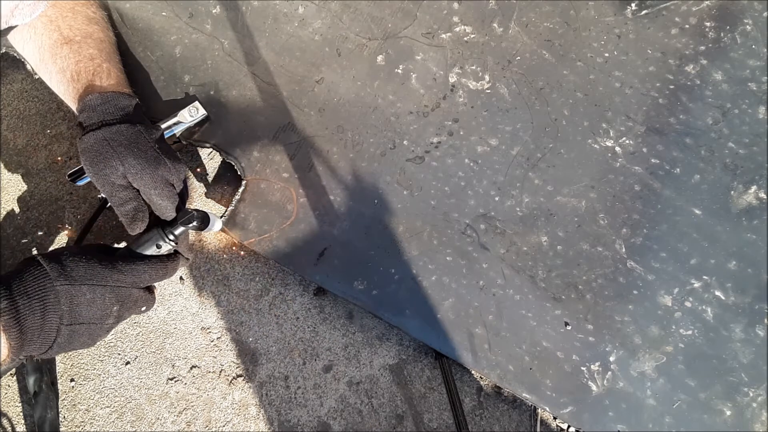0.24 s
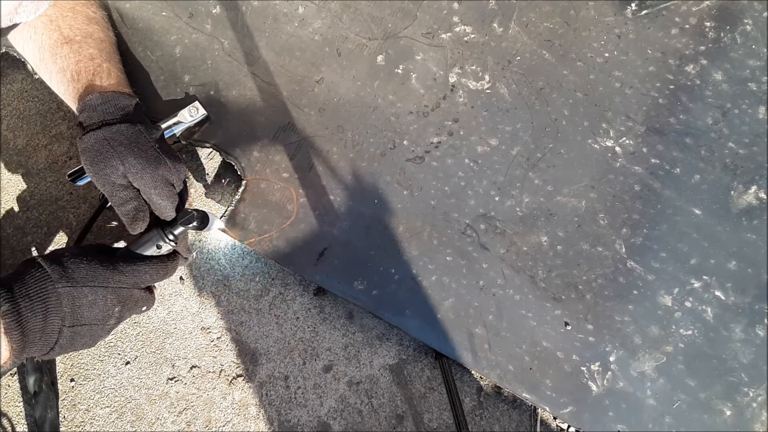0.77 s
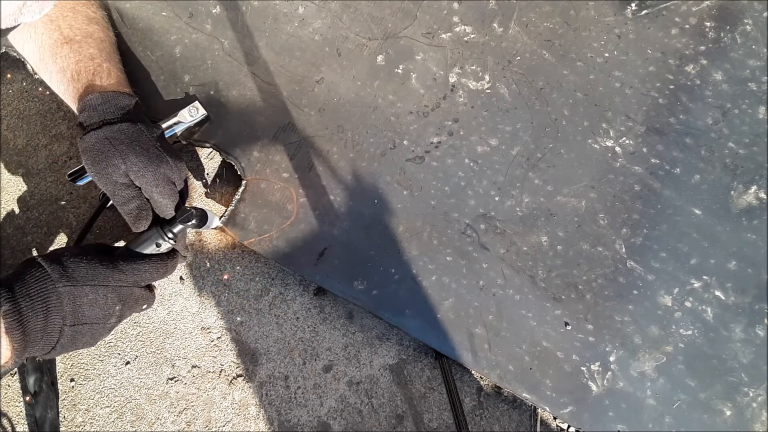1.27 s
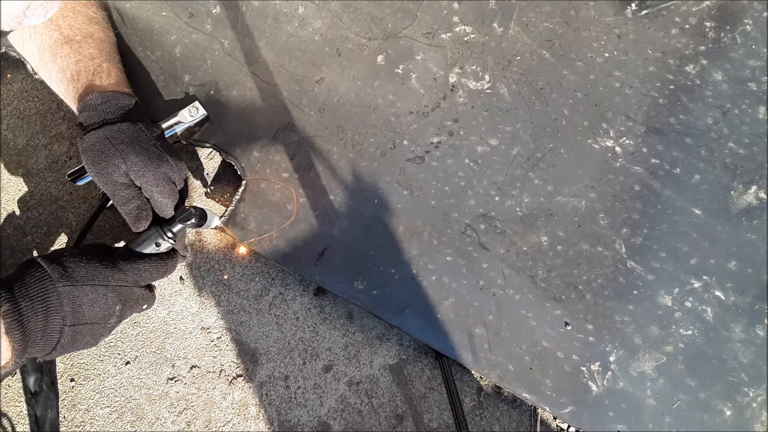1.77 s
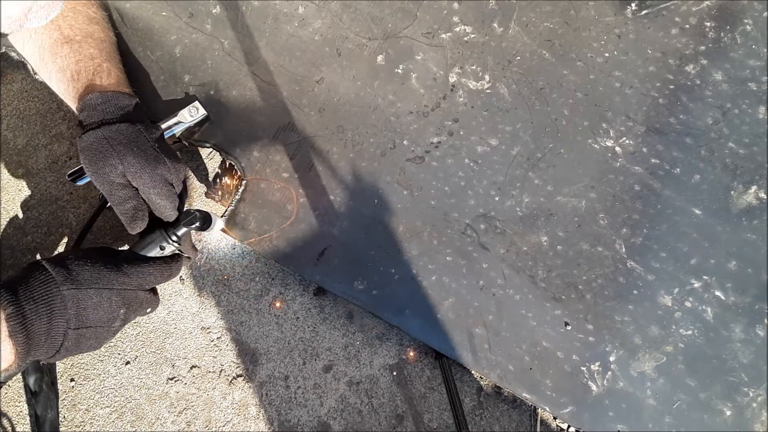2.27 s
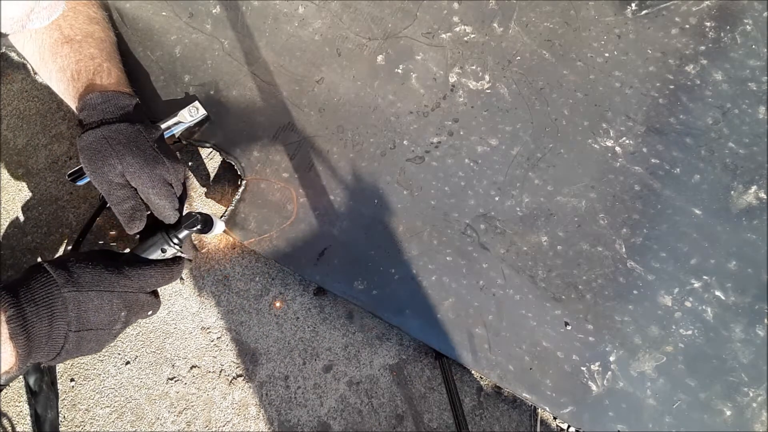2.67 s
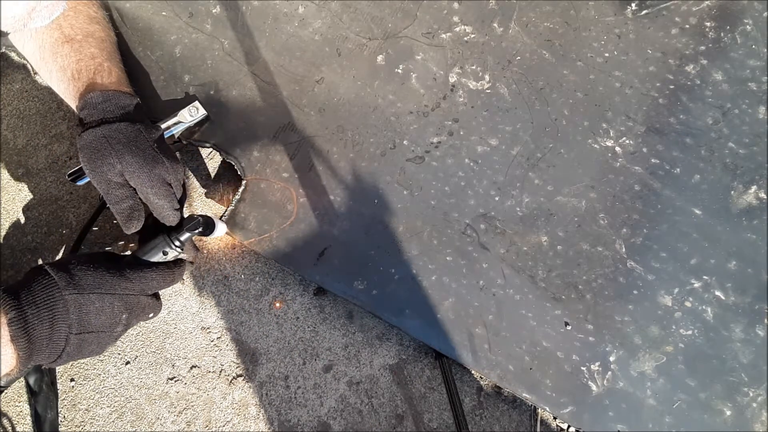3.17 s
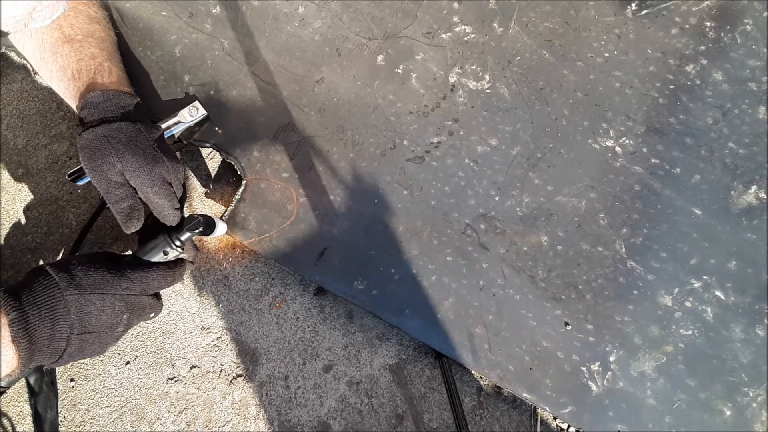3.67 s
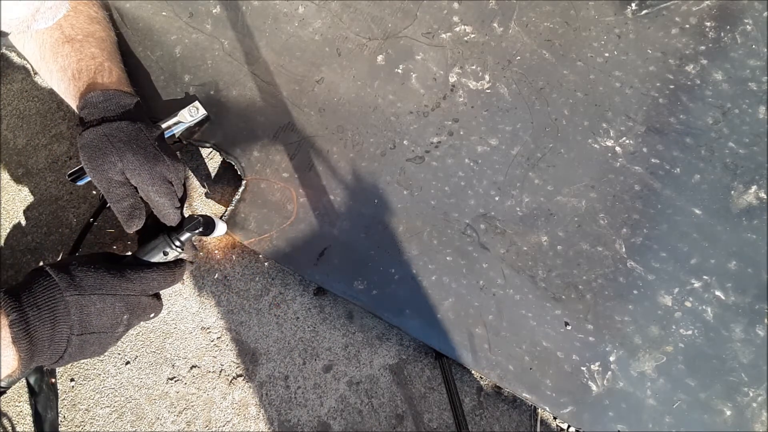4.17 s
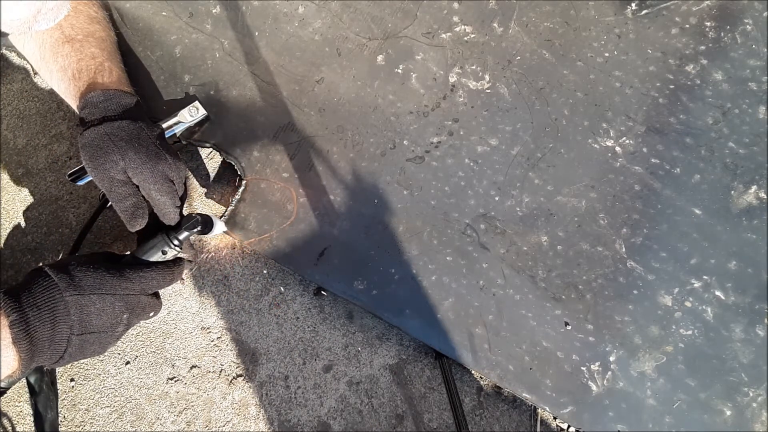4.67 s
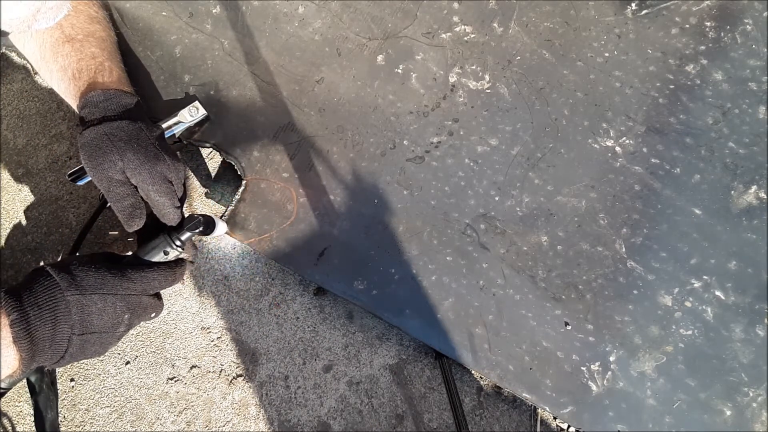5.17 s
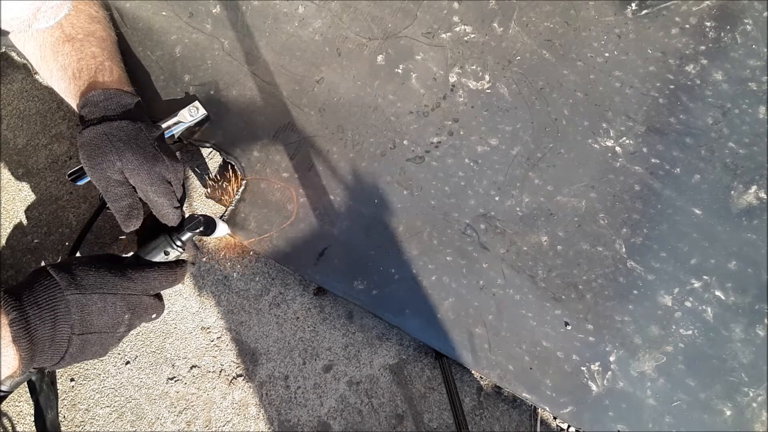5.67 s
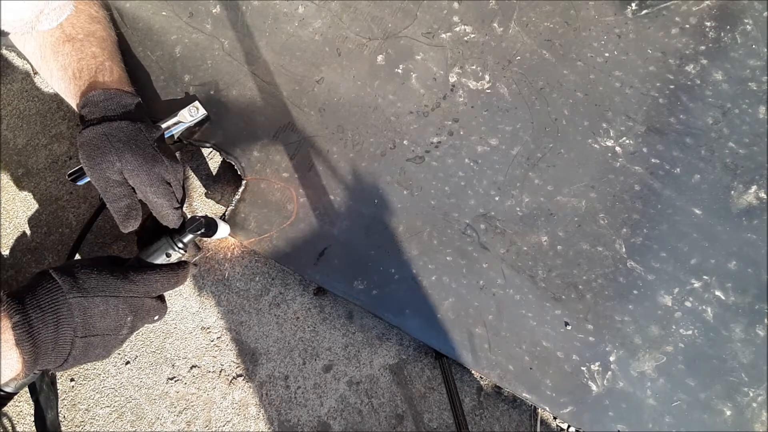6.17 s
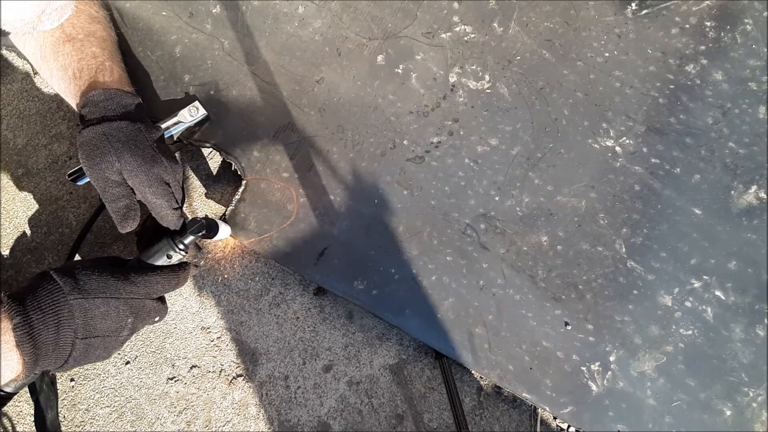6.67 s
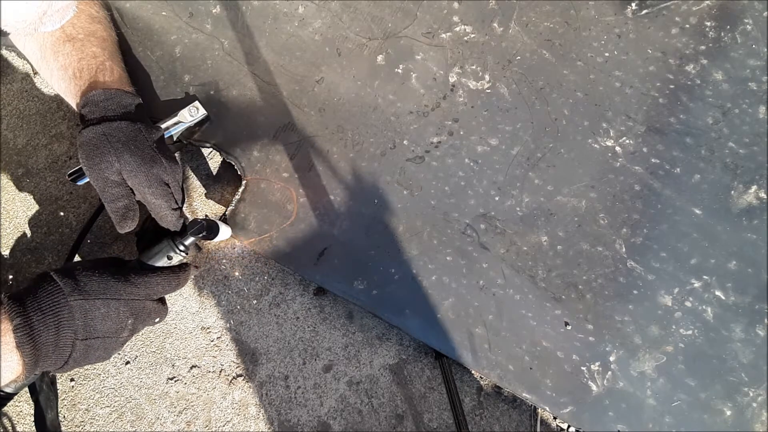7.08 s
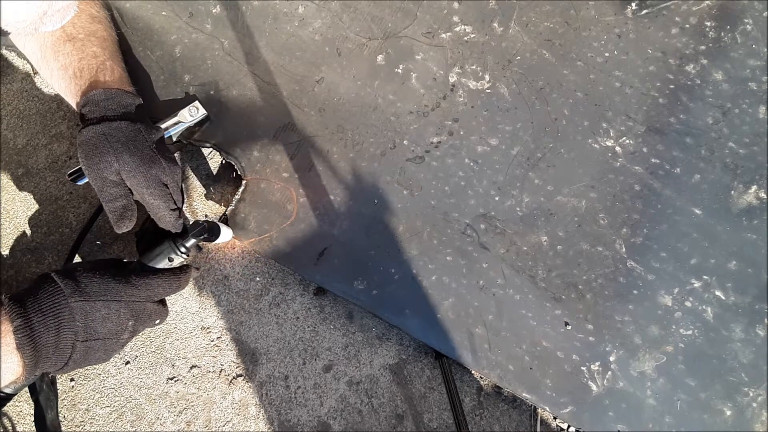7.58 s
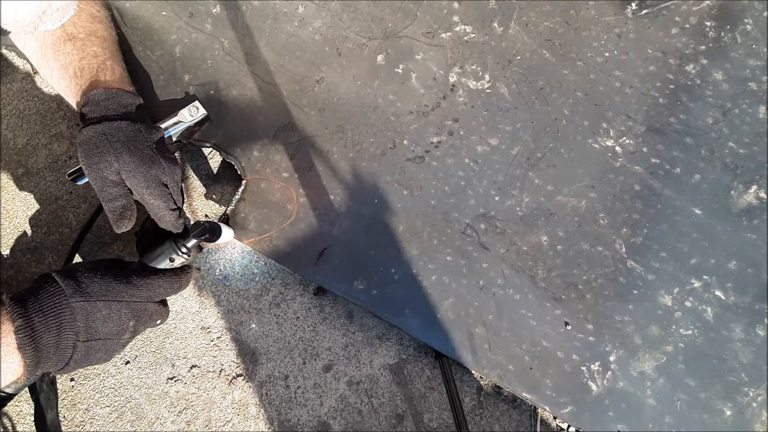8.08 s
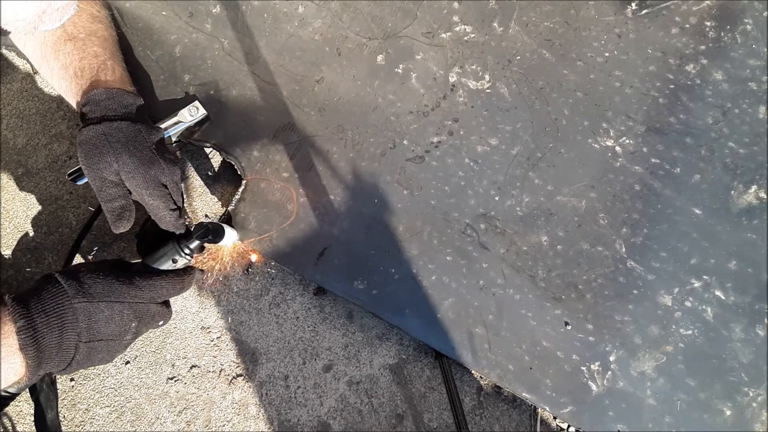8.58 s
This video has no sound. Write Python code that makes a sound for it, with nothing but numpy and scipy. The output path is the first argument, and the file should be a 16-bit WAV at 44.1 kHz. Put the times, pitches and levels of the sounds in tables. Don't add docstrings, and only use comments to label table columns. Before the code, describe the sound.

Close up outdoors, a plasma torch cuts a steel sheet. Bright, fizzy, raspy arc noise comes in short uneven bursts, each ending in a dull pop and restarting with a tiny buzz, while compressed air hisses steadily beneath. Longer burns follow, and the last runs unbroken to the end. Thin stereo sound, slightly left, with short reflections off metal and concrete and a faint low murmur far away.

```python
import sys
import numpy as np
from scipy import signal
from scipy.fft import rfft, irfft, next_fast_len
from scipy.io import wavfile
from scipy.ndimage import uniform_filter1d, map_coordinates

SR = 44100
rng = np.random.default_rng(int(sys.argv[2]) if len(sys.argv) > 2 else 0)


def amplitude_ratio(level_db):
    exponent = np.asarray(level_db, float) / 20
    return 10 ** exponent


def output_pcm(signal):
    pcm = np.clip(np.atleast_2d(signal).T, -1, 1) * 32767
    wavfile.write(sys.argv[1], SR, np.round(pcm).astype(np.int16))


N = 389403
TIME = np.arange(N) / SR

# strike_s, out_s, settling_time_s, start_over_full_power_db
BURNS = [
    (.042, .2158, 0.031, 7),
    (0.393, 0.515, .03, 2),
    (0.679, 0.903, .012, -7),
    (1.067, 1.198, .012, -5),
    (1.372, 1.784, 0.018, -7),
    (1.953, 3.591, 0.013, -4),
    (3.843, 4.21, 0.18, -6),
    (4.399, 4.807, .05, -8.5),
    (5.163, 5.2483, 0.046, 2),
    (5.418, 9, 0.07, -11),
]


def burning():
    total = np.zeros(N)
    for strike, out, settling, start_db in BURNS:
        rise = np.clip((TIME - strike) / 0.0022, 0, 1)
        settle = amplitude_ratio(start_db * np.clip(1 - (TIME - strike) / settling, 0, 1))
        fall = np.clip((out - TIME) / .001 + 1, 0, 1)
        total += rise * settle * fall
    return total


# time_s, jet_power_db, bite_into_steel_db, stand_off_brightness_db
TORCH_PATH = [(0, -41, -2, 0), (.5, -40, -1, 3), (.9, -38, 1, 3), (1.45, -34.5, -1, 1.5),
              (1.75, -34.5, -5, 1), (2.2, -36, 0.5, 2.5), (2.75, -46, 0.5, 0), (3.05, -42.5, -0.5, 3.5),
              (3.25, -45, 2.5, 0.5), (3.58, -36.5, 2.5, 4), (4.2, -36.5, 2.5, 2), (4.8, -33.5, 1, 2),
              (5.5, -39, 3.5, 3.5), (5.85, -36.5, -1, 1.5), (6.05, -39.5, 2, 1.5), (6.65, -37.5, -1, 3),
              (8.4, -38.5, 0, 1.5), (8.78, -35.5, -0.5, 2.5)]
# time_s, length_s, jet_change_db, bite_change_db
STUMBLES = [(1.41, .04, 2, 0), (1.72, .14, 2, -1.5), (2.095, 0.032, -3.5, -6), (2.22, .06, 0, 3.5),
            (2.707, .04, -1.5, 4.5), (3.114, .05, 2.5, -4), (3.423, .04, 2.5, -4.5),
            (4.407, 0.014, 7.5, -4), (4.557, 0.049, 0.5, 0), (4.712, 0.074, -4.5, -1.5), (5.6, .18, -2, 2),
            (6.224, .08, 0, 0.5), (6.8, .06, -1, 1), (7.15, 0.029, 1.5, 0), (7.293, 0.031, -3.5, -1),
            (7.328, 0.063, 0, 2.5), (7.427, 0.077, -2, 2), (7.603, 0.11, 1.5, 2), (8.0, .03, 2, -4),
            (8.026, 0.024, -0.5, 3), (8.47, .05, 1, 2), (8.58, .1, -1.5, 0)]
# pitch_hz, level_db (per Hz)
HISS_COLOUR = [(4000, -24), (5600, -7.5), (6300, -3), (8000, -3), (10000, 2), (10800, 2), (12500, -21)]
FIZZ_COLOUR = [(9500, -18), (11000, -1), (12000, 3), (14000, 2), (15400, 0.5), (16500, -1)]
RASP_COLOUR = [(900, -17.5), (1600, -4), (2000, -0.5), (2500, -1.5), (3700, -1), (5000, -1), (7000, -16.5)]
ROAR_COLOUR = [(60, -12), (150, -14), (400, -3), (800, 1.5), (1300, 1), (2400, -9)]


def arc():
    s, *columns = np.transpose(TORCH_PATH)
    jet_db, bite_db, fizz_db = [np.interp(TIME, s, column) for column in columns]
    for at, length, jet_step, bite_step in STUMBLES:
        bump = np.exp(-.5 * (2 * (TIME - at) / length) ** 2)
        jet_db = jet_db + jet_step * bump
        bite_db = bite_db + bite_step * bump
    flicker_db = .25 * wobble(7.6) + 0.57 * wobble(25) + 0.79 * wobble(110) + 0.29 * wobble(500)

    hiss_db = 2.5 + .4 * wobble(8)
    fizz_db = fizz_db + 2.5 + .4 * wobble(8)
    rasp_db = -3.5 + 0.64 * bite_db + 1.78 * wobble(15)
    roar_db = -12 + 1.44 * bite_db + 0.68 * wobble(9)

    hiss = amplitude_ratio(hiss_db) * turbulence(HISS_COLOUR, patchy_db=.7, drift_db=1.6, spit=.2, spread=.66)
    fizz = amplitude_ratio(fizz_db) * turbulence(FIZZ_COLOUR, patchy_db=.7, drift_db=1.6, spit=.2, spread=.62)
    rasp = amplitude_ratio(rasp_db) * turbulence(RASP_COLOUR, patchy_db=0.84, drift_db=-0.8, spit=0.24, spread=0.51)
    roar = amplitude_ratio(roar_db) * turbulence(ROAR_COLOUR, patchy_db=2.0, drift_db=1.3, spit=0.31, spread=0.45)
    return burning() * amplitude_ratio(jet_db + flicker_db) * (hiss + fizz + rasp + roar)


# start_s, length_s, first_rate_hz, last_rate_hz, level_db
BUZZES = [
    (0.046, .016, 503, 450, -47),
    (.396, .014, 443, 420, -43),
    (0.6907, .04, 528, 402, -32),
    (1.074, .036, 387.5, 443, -34),
    (1.3785, .014, 666, 392, -36),
    (1.963, .011, 523, 497, -37.5),
    (3.843, .008, 458, 450, -44),
    (4.399, .012, 462, 452, -40.5),
    (5.169, .008, 500, 500, -40),
]


def buzz():
    out = np.zeros(N)
    for s, length, first_hz, last_hz, db in BUZZES:
        chance = rng.standard_normal((40, 3))
        at = 0.
        for early, size, wide in chance:
            if at > length:
                break
            start, shape = puff(s + at, .17 * amplitude_ratio(2.5 * wide))
            out[start:start + len(shape)] -= amplitude_ratio(db + 1.5 + 2.5 * size) * shape
            rate_hz = first_hz + (last_hz - first_hz) * at / length
            at += amplitude_ratio(1.4 * early) / rate_hz
    return out


# time_s, peak_db, width_ms, sign (-1 collapse, +1 burst)
POPS = [(.2156, -26, .15, -1), (.5147, -25.5, .17, -1), (.8982, -22, .13, -1), (1.198, -21, .13, -1),
        (1.7807, -16.5, .13, -1), (3.5893, -25, .24, -1), (4.2051, -19, .17, -1), (4.8053, -21, .17, -1),
        (5.2461, -19.5, .16, -1), (.0423, -29, .15, 1), (1.967, -25, .15, 1), (2.142, -26, .09, 1),
        (2.2, -24, .1, 1), (5.168, -23, .15, 1), (6.8132, -31, .1, -1), (6.9082, -31, .1, 1),
        (6.923, -29, .08, 1), (8.0574, -31, .1, -1)]


def pops():
    out = np.zeros(N)
    for s, db, width_ms, sign in POPS:
        start, shape = puff(s, .75 * width_ms)
        out[start:start + len(shape)] += sign * amplitude_ratio(db - .5) * shape
    return out


# time_s, level_db
AIR_LEVEL = [
    (0, -43),
    (.6, -41.5),
    (1, -38),
    (3.6, -37.5),
    (4.3, -36),
    (5.3, -37.5),
    (8.83, -44),
]
# pitch_hz, level_db (per Hz)
AIR_COLOUR = [(150, -13), (450, -12), (1150, -16.5), (2000, -4), (4000, -0.5), (9000, 0), (12000, 2),
              (16000, 1.5)]


def air():
    level_db = np.interp(TIME, *np.transpose(AIR_LEVEL)) + 0.22 * wobble(12)
    return amplitude_ratio(level_db) * turbulence(AIR_COLOUR, patchy_db=1.57, drift_db=1.3, spit=0.031, spread=0.67)


# centre_hz, width_hz, level_db
FIRST_GRIP = [
    [(500, 1600, 1.4), (2400, 300, -6), (4000, 350, 3), (5900, 300, -7), (7100, 500, 1.5), (9600, 500, 3),
     (11100, 700, -3), (12700, 450, 3), (14100, 700, -3), (15400, 400, 3)],
    [(2400, 300, -5), (3500, 300, 2.5), (4200, 300, 2), (5900, 350, -6), (8200, 700, 2), (11000, 600, -2),
     (12500, 600, 2.5), (14200, 700, -2.5), (15300, 500, 3)],
]
SECOND_GRIP = [
    [(500, 1600, 1.4), (970, 150, 2), (1960, 150, 2.5), (2450, 250, -5.5), (3500, 500, 2), (7900, 500, 2.5),
     (8700, 300, -2.5), (10100, 500, 3), (11900, 400, 2.5), (12700, 350, -2.5), (13300, 300, 4),
     (14200, 300, 3)],
    [(970, 150, 2), (1960, 150, 2.5), (2450, 250, -5), (3500, 350, 2.5), (5300, 200, 2.5), (8100, 700, 3.5),
     (9000, 450, -3.5), (9900, 400, 2.5), (11700, 600, 3), (13300, 300, 1.5), (14200, 300, 2.5)],
]
# start_s, end_s
GRIP_TURN = (2, 7)


def port(x, echoes, side, lag):
    def paths(hz):
        total = 1
        for delay_ms, db, corner_hz in echoes:
            total = total + amplitude_ratio(db) * np.exp(-2j * np.pi * hz * delay_ms / 1000 - (hz / corner_hz) ** 2)
        return total * np.exp(-2j * np.pi * hz * lag / SR)

    def shade(grip, hz):
        return amplitude_ratio(sum(db * np.exp(-(2 * (hz - centre) / width) ** 2 / 2) for centre, width, db in grip[side]))

    first, second = filtered(x, lambda hz: paths(hz) * [shade(FIRST_GRIP, hz), shade(SECOND_GRIP, hz)])
    turned = np.interp(TIME, GRIP_TURN, [0, 1])
    return (1 - turned) * first + turned * second


# pitch_hz, time_to_fall_60_db_s
YARD_RING = [(200, 0.16), (2000, 0.071), (12000, 0.048)]


def yard(x):
    out = np.zeros((2, N + SR))
    hop, kinds = SR // 25, 30
    hz, t, z = signal.stft(rng.standard_normal((kinds, 2, SR // 10)), SR, nperseg=128)
    fading = amplitude_ratio(-60 * t / along(YARD_RING, hz)[:, None])
    tails = signal.istft(z * fading, SR, nperseg=128)[1]
    for start in range(0, N, hop):
        tail = tails[rng.integers(kinds)]
        wet = signal.fftconvolve(x[None, start:start + hop], tail / np.linalg.norm(tail[0]), axes=1)
        out[:, start + 60:start + 60 + wet.shape[1]] += wet
    return out[:, :N]


# pitch_hz, level_db (per Hz)
DISTANT_COLOUR = [(30, 22.5), (60, 0), (100, -21), (250, -4), (400, -10.5), (800, -20), (1500, -65)]


def distant():
    murmur = turbulence(DISTANT_COLOUR, patchy_db=0.5, drift_db=1.0, spit=0, spread=1.3)
    return amplitude_ratio(-50 + 3.0 * wobble(8.1)) * murmur


def turbulence(colour, patchy_db, drift_db, spit, spread):
    z = signal.stft(rng.standard_normal((3, N), dtype=np.float32), nperseg=512)[2]
    quick_db = patchy_db * patches(z.shape[1:], tall=6, long=10)
    slow_db = drift_db * patches(z.shape[1:], tall=4, long=160)
    both, *own = unit(signal.istft(z * amplitude_ratio(quick_db + slow_db), nperseg=512)[1][:, :N])
    spits = (rng.random(N) < 500 / SR) * rng.uniform(-1.03, 1, N)
    heard = both + spit * unit(spits) + spread * np.array(own)
    return unit(filtered(heard, lambda hz: amplitude_ratio(along(colour, hz))))


def patches(shape, tall, long):
    field = uniform_filter1d(rng.standard_normal(shape), size=tall, axis=0)
    return unit(uniform_filter1d(field, size=long, axis=1))


def puff(s, width_ms):
    start = int(s * SR) - 64
    since_peak = (start + np.arange(128)) / SR - s
    return start, np.exp(-.5 * (since_peak / (width_ms / 1000)) ** 2)


def wobble(rate):
    knots = rng.standard_normal(int(N * rate / SR) + 4)
    return map_coordinates(knots, [TIME[::8] * rate]).repeat(8)[:N]


def filtered(x, response):
    m = next_fast_len(N + 8192)
    return irfft(rfft(x, m) * response(np.fft.rfftfreq(m, 1 / SR)), m)[..., :N]


def along(points, hz):
    f, v = np.transpose(points)
    return np.interp(np.log(hz + 1), np.log(f + 1), v)


def unit(x):
    return x / np.sqrt(np.mean(x ** 2) + 1e-20)


# delay_ms, level_db, corner_hz
ECHO_LEFT = [(2.08, -16, 4800), (2.26, -19, 2600), (3.02, -17.5, 4000), (5.8, -30, 2500)]
ECHO_RIGHT = [(2.08, -16, 3430), (3.02, -12.5, 7000), (4.9, -16.5, 2500)]


def scene():
    left, right = arc() + buzz() + pops() + air()
    near_left = amplitude_ratio(.7) * port(left, ECHO_LEFT, side=0, lag=0)
    near_right = amplitude_ratio(-.7) * port(right, ECHO_RIGHT, side=1, lag=6)
    return np.array([near_left, near_right]) + amplitude_ratio(-11) * yard(left) + distant()


def band_limit(x):
    return signal.sosfilt(signal.butter(12, 17090, fs=SR, output="sos"), x)


def record(dry):
    cuts = [signal.butter(2, hz, "high", fs=SR, output="sos") for hz in (250, 120)]
    thin = signal.sosfilt(np.vstack(cuts), dry, axis=1)
    kept = filtered(thin, lambda hz: hz < 15750)
    return band_limit(kept)


dry = scene()
out = record(dry)
output_pcm(out)
```